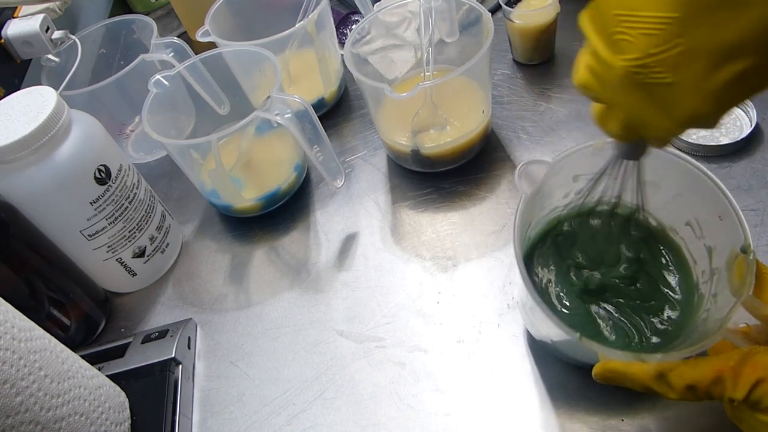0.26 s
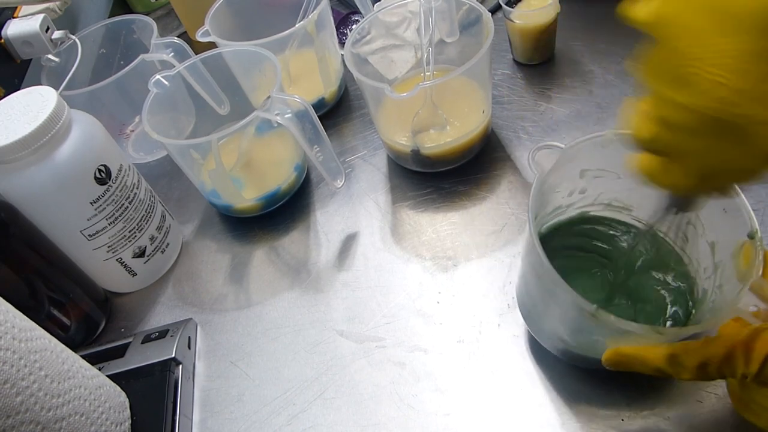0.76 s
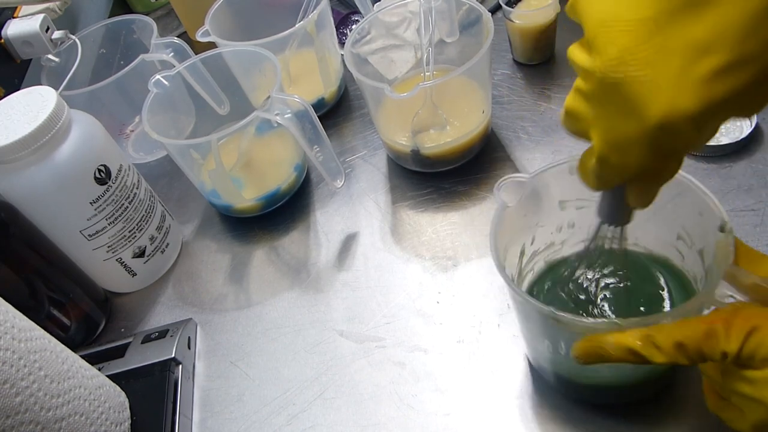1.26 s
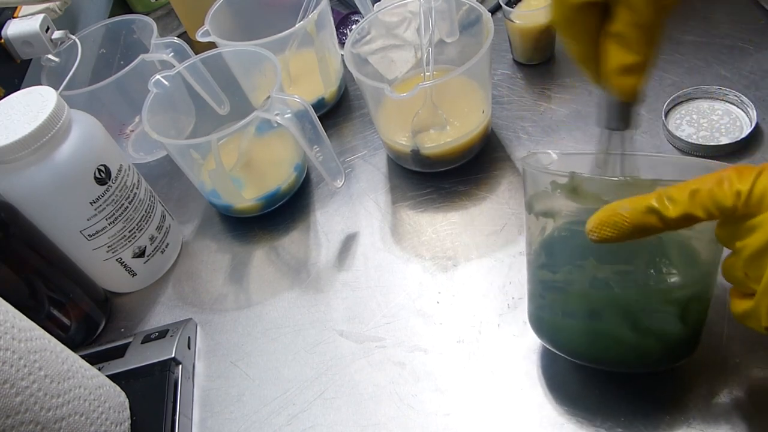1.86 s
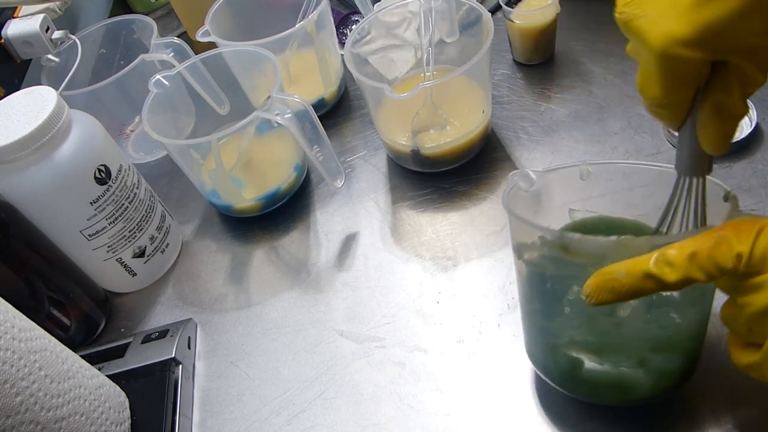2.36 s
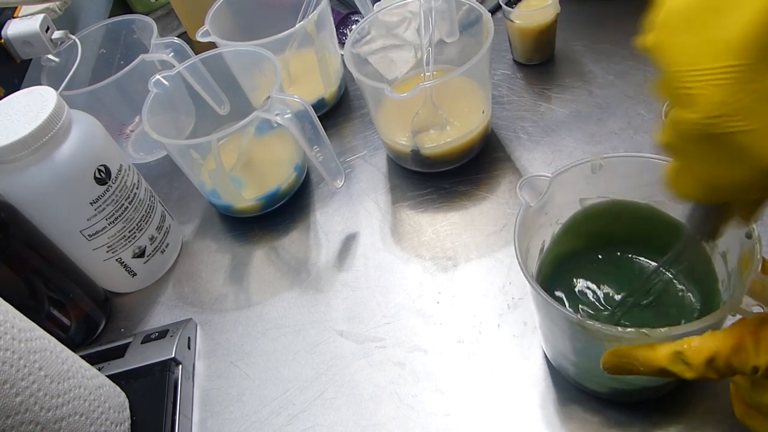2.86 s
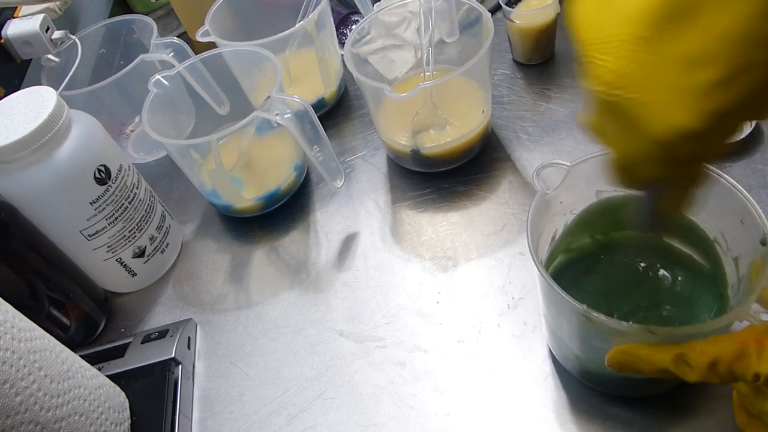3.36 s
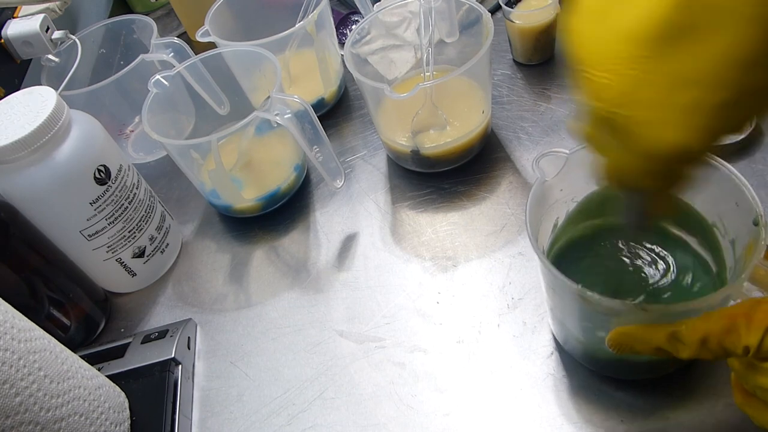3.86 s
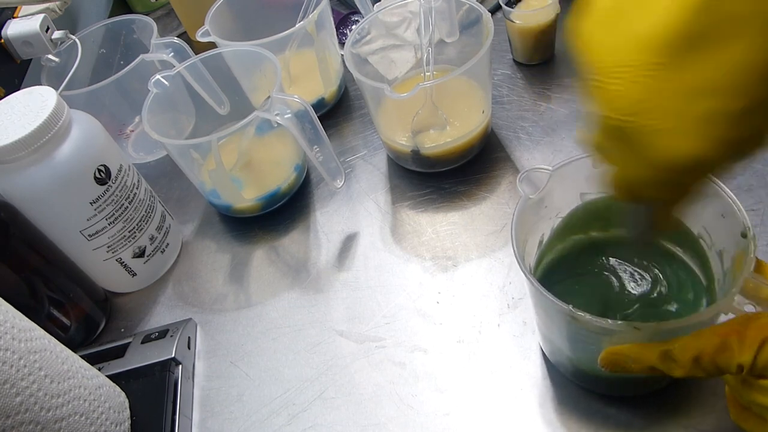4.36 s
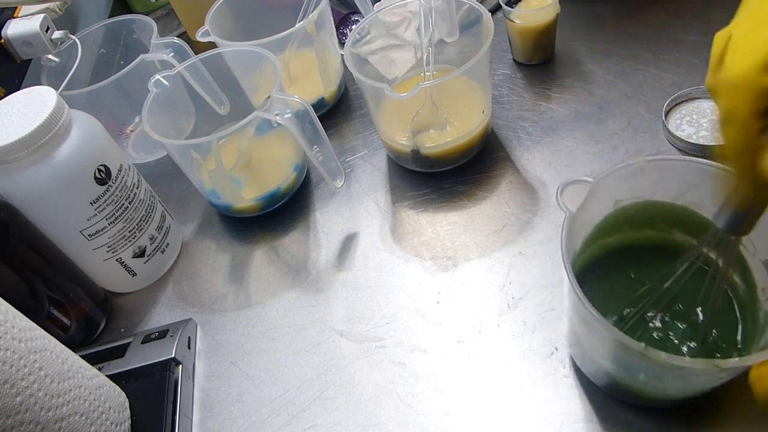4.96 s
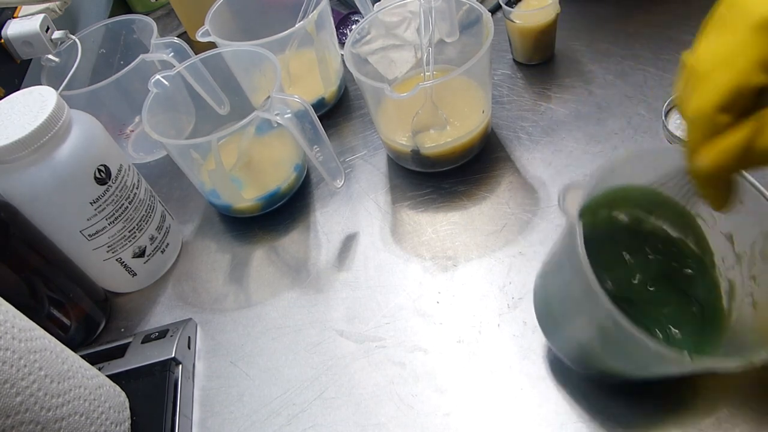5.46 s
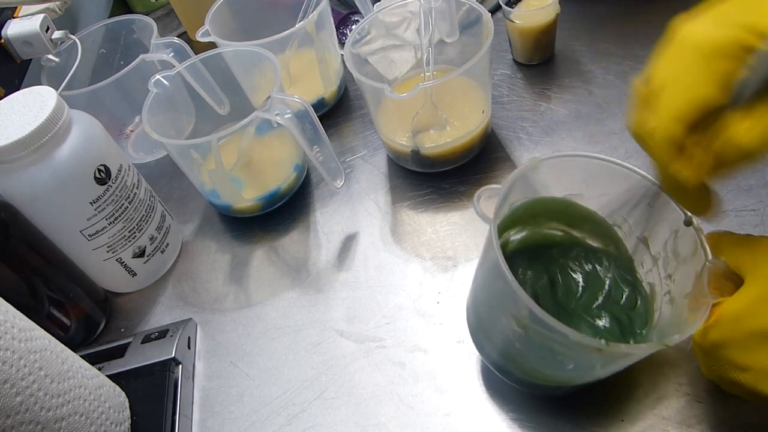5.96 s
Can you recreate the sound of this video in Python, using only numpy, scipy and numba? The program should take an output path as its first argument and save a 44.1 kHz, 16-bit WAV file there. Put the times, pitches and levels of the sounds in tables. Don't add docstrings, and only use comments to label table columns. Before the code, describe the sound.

Quick bunches of hard plastic clacks from a wire whisk, with scraping, gulping batter and a short pause before the beating resumes.

```python
import sys
import numpy as np
from scipy import signal
from scipy.fft import rfft, irfft, next_fast_len
from scipy.io import wavfile
from scipy.ndimage import uniform_filter1d
from numba import njit

SR = 44100
rng = np.random.default_rng(int(sys.argv[2]) if len(sys.argv) > 2 else 0)


def voltage_ratio(level):
    return 10 ** (np.asarray(level, float) / 20)


def master_out(mix):
    frames = np.transpose(np.atleast_2d(mix))
    ceiling = np.clip(frames, -1, 1)
    pcm = np.round(ceiling * 32767).astype(np.int16)
    wavfile.write(sys.argv[1], SR, pcm)


N = 273949


def level(x, db):
    return x * voltage_ratio(db) / np.sqrt(np.mean(x ** 2))


def colour(x, points):
    hz, db = np.transpose(points)
    size = next_fast_len(x.shape[-1])
    f = np.arange(size // 2 + 1) * SR / size
    gain = voltage_ratio(np.interp(np.log(f + 1), np.log(hz), db))
    return irfft(rfft(x, size) * gain, size)[..., :x.shape[-1]]


def fade(t, t60):
    return np.exp(-np.log(1000) * t / t60)


@njit
def follow(x, attack, release):
    e, out = 0., np.empty(len(x))
    for i in range(len(x)):
        e += (x[i] - e) * (attack if x[i] > e else release)
        out[i] = e
    return out


def slips(rate, spread_db):
    size_db = spread_db * np.minimum(rng.exponential(size=N), 4)
    return (rng.random(N) < rate / SR) * rng.standard_normal(N) * voltage_ratio(size_db)


def strokes(rate):
    k = int(SR / rate)
    held = np.repeat(rng.standard_normal(N // k + 1), k)
    return 1.47 * uniform_filter1d(uniform_filter1d(held, k), k)[:N]


# start_s, peak_db, belly_db, face_hz
FOOT_BLOWS = [(0.2087, -22.5, -8.5, 2790), (.2594, -48, 7, 1940), (.2705, -28, -6, 2040),
              (1.4169, -16, -7.5, 1920), (2.1167, -8, -9, 1570), (3.3626, -14.5, -18, 2210),
              (3.426, -19.5, -8, 2030), (3.9423, -12.5, -8.5, 3090), (4.1583, -10.5, -20, 2450),
              (4.1849, -16, -4.5, 1890), (4.509, -15, -14, 1930), (4.967, -20, -9, 2080),
              (5.122, -24.5, -8, 1795)]
HEEL_BLOWS = [(0.4868, -18, -11, 1990), (0.5303, -11.5, -15, 2220), (0.6889, -20, -18, 3120),
              (1.118, -14, -9.5, 2000), (1.616, -10, -17, 2206), (2.6034, -7.5, -18.5, 3480),
              (2.957, -9, -12.5, 3080), (3.2675, -12.5, -19, 2460), (3.3898, -17.5, -15, 2150),
              (3.575, -11, -16.5, 3363), (3.608, -7.5, -22, 2610), (4.3622, -16.5, -14.5, 2260),
              (4.3824, -13, -27, 2550), (4.601, -14, -15, 2918), (5.912, -28, -6, 3220),
              (6.135, -20, -15, 2020)]
WAIST_BLOWS = [(0.626, -14.5, -15, 3580), (0.895, -20.5, -13, 1940), (1.2928, -15, -9, 2140),
               (1.66, -14.5, -10, 1880), (1.7584, -12, -5, 3340), (1.8475, -24, -7.5, 1756),
               (2.1899, -20.5, -27, 2480), (2.2612, -15, -7.5, 2480), (2.308, -15.5, -14, 4030),
               (2.4326, -16, -10.5, 2790), (2.5487, -12.5, -13.5, 2390), (2.857, -9, -21.5, 3480),
               (2.9038, -16.5, -5.5, 2800), (3.462, -19.5, -19, 1970), (3.5124, -13.5, -22, 2320),
               (3.7072, -22.5, -16, 3970), (3.7547, -13.5, -21, 2170), (3.808, -15.5, -12, 2130),
               (3.8702, -15, -36, 2470), (4.1186, -18.5, -33, 2180), (4.62, -15, -29, 2510),
               (4.744, -22, -14, 4120), (5.052, -19, -10.5, 2010), (5.658, -9, -17.5, 3114),
               (5.753, -12.5, -11.5, 2430), (5.849, -28, -5, 2640), (5.874, -22, -11.5, 2060),
               (6.173, -30, -5.5, 3300)]
CHEST_BLOWS = [(0.443, -17, -14, 2010), (0.7758, -10, -20.5, 4200), (0.9926, -11, -20, 3400),
               (1.0141, -12.5, -11.5, 1880), (1.6113, -21.5, -15, 2210), (1.974, -17.5, -8, 2300),
               (2.032, -11.5, -12, 2110), (2.164, -19.5, -4, 3520), (2.205, -17.5, -13, 3040),
               (2.324, -10, -11.5, 3630), (2.481, -17.5, -10.5, 2720), (2.7467, -13.5, -30, 3160),
               (3.1704, -14.5, -25, 2100), (4.304, -16.5, -12, 2150), (4.3194, -15.5, -16.5, 2340),
               (5.796, -24.5, -7, 2480), (6.011, -19, -9, 1750)]
NECK_BLOWS = [(0.0678, -13, -12, 2880), (0.107, -21.5, -17, 2500), (0.1332, -7.5, -17, 3980),
              (0.3373, -4.5, -12.5, 3180), (0.6496, -13.5, -13.5, 3240), (0.817, -14.5, -17, 3570),
              (0.9159, -5, -21.5, 4010), (1.921, -13.5, -16, 2610), (2.496, -14, -15, 3090),
              (2.6986, -16.5, -16, 2580), (2.718, -13, -18, 2260), (3.3251, -16.5, -18, 2180),
              (3.644, -16.5, -26, 2100), (3.849, -14.5, -12, 2650), (4.2599, -34, 2, 1840),
              (4.4048, -9, -17, 4077), (5.463, -19, -13.5, 3010), (5.4906, -18.5, -10.5, 2100),
              (5.561, -36, -1, 2550), (5.971, -9.5, -16.5, 3060), (6.0308, -17.5, -8, 2670),
              (6.0939, -10, -16, 1560)]
RIM_BLOWS = [(.587, -8.5, -22, 4050), (.736, -6.5, -30, 4050), (0.843, -11, -18.5, 3420),
             (0.9784, -12.5, -18, 3020), (1.1, -7.5, -49, 2630), (1.178, -16, -23, 3910),
             (1.252, -19, -38, 4230), (1.4088, -22.5, -33, 1830), (2.589, -18, -31, 2090),
             (2.816, -14.5, -19, 3660), (3.128, -9, -26, 3060), (4.0012, -12.5, -22, 3410),
             (4.088, -24, -25, 2610), (5.6554, -21, -29, 3280)]
BELLY_PITCHES = [771, 832.5, 1052, 1197, 1249, 1173]
# start_s, peak_db
LIGHT_TOUCHES = [(.02, -19), (.061, -24), (.332, -31), (.5202, -25), (.702, -21), (.7291, -18.5),
                 (.8254, -21), (.9448, -18), (1.0961, -19), (2.369, -20.5), (2.4104, -20.5),
                 (2.4542, -18.5), (2.6312, -17), (2.7384, -20), (2.8265, -28), (2.9494, -19), (2.9744, -27),
                 (3.193, -22), (3.2568, -25), (3.6234, -19), (3.6382, -27), (3.8965, -16.5),
                 (4.0404, -20.5), (4.433, -18), (4.5465, -22.5), (4.5665, -19.5), (5.6897, -23.5),
                 (5.7454, -32), (5.9627, -25), (6.1054, -19.5)]
# start_s, peak_db
MORE_TOUCHES = [(.0121, -23), (.4774, -38), (1.0867, -24), (1.2654, -25.5), (1.482, -25), (2.009, -19.5),
                (2.0835, -21.5), (2.5658, -34), (2.8394, -22), (3.477, -21.5), (3.7218, -21.5), (4.651, -32),
                (4.6862, -31), (4.8224, -32.5), (5.301, -41), (5.581, -28), (5.603, -25.5), (5.7124, -21)]


def contacts():
    heights = (FOOT_BLOWS, HEEL_BLOWS, WAIST_BLOWS, CHEST_BLOWS, NECK_BLOWS, RIM_BLOWS)
    struck = [tuple(row) + (hz,) for rows, hz in zip(heights, BELLY_PITCHES) for row in rows]
    light = [(s, db, -11, 2350, 990) for s, db in list(LIGHT_TOUCHES) + list(MORE_TOUCHES)]
    return struck + light


# pitch_hz, level_db, t60_s
JUG_MODES = [(700, -5, .08), (755, 0, .07), (815, 0, .07), (990, -2, .06), (1110, -5, .05), (1235, 0, .06),
             (1590, -3, .045), (1755, -2, .045), (2000, 0, .045), (2160, 0, .045), (2350, 0, .04),
             (2530, 0, .045), (2870, -1, .035), (3050, -1, .035), (3190, -1, .035), (3370, -1, .035),
             (3525, 0, .045), (3800, -2, .035), (4050, 0, .035), (4500, -8, .03)]


def rings(t, spot_db, detune):
    hz, db, t60 = np.array(JUG_MODES).T[:, :, None]
    wet_damp = 0.91
    tone = np.sin(2 * np.pi * hz * (1 + detune[:, None]) * t)
    return np.sum(voltage_ratio(db + spot_db[:, None]) * fade(t, t60 * wet_damp) * tone, axis=0)


# freq_hz, level_db (per Hz)
BLOW_COLOUR = [(300, -30), (600, -10), (800, 0), (1500, -3), (2200, -2), (4000, -3), (4600, -8),
               (9900, -12), (14500, -28), (16000, -44)]


def blows(stir_db):
    out, size = np.zeros(N + 8192), 4096
    t = np.arange(size) / SR
    belly = [(100, -70), (350, -20), (560, -10), (690, -19), (740, 0), (1350, 0), (1700, -30), (3000, -60)]
    face = [(300, -70), (1150, -30), (1500, -6), (1950, 0), (4200, 0), (4900, -8), (7000, -30)]
    edge = [(1000, -70), (4000, -30), (4900, 0)]
    spot_spread_db, tick_db, snap_db = 7, 13, -1
    grip_t60_s, grip_db = 0.025, 12
    for s, peak_db, belly_db, face_hz, belly_hz in contacts():
        i = int(s * SR)
        chance = rng.standard_normal((2, len(JUG_MODES)))
        wires = rng.random((2, 5))
        edge_db = -12 + 0.096 * (stir_db[i] + 34.5) + 0.12 * (peak_db + 13.5)
        edge_db = edge_db - 1.5 * rng.standard_normal()
        wall = rings(t, spot_spread_db * chance[0], 0.0012 * chance[1])
        wall = wall / np.abs(wall).max()
        wall = wall + voltage_ratio(-10.0) * fade(t, 0.054) * np.sin(2 * np.pi * face_hz * t)
        wall = wall + voltage_ratio(-11.5) * fade(t, 0.089) * np.sin(2 * np.pi * belly_hz * t)
        bunch = np.zeros(size)
        lag = wires[0] * .008 * np.arange(5) / 4
        landing = np.clip(lag * SR, 0, 399).astype(int)
        np.add.at(bunch, landing, voltage_ratio(-8.0 * wires[1]) * fade(lag, 0.029))
        chatter = (rng.random(size) < 1200 / SR) * rng.uniform(-1.01, 1, size)
        bunch += voltage_ratio(-13.0) * chatter * fade(t, 0.15)
        shake = signal.fftconvolve(fade(t, 0.014) + voltage_ratio(-11.5) * fade(t, 0.15), np.abs(bunch))[:size]
        tick = colour(bunch, BLOW_COLOUR)
        tick = tick / np.abs(tick).max()
        crack = shake * level(colour(rng.standard_normal(size), BLOW_COLOUR), 0)
        crack = crack + voltage_ratio(tick_db) * tick
        ring = signal.fftconvolve(wall, bunch)[:size] + voltage_ratio(-17) * crack
        ring = ring * (fade(t, grip_t60_s) + voltage_ratio(grip_db))
        ring = ring + voltage_ratio(snap_db) * np.abs(ring).max() * tick
        rough_edge = edge + list(zip((5800, 7700, 9500, 11400, 13700), 2.6 * chance[1]))
        parts = ((ring, belly, belly_db + 4.0), (ring, face, 0), (crack, rough_edge, edge_db + 7.0))
        for source, zone, db in parts:
            part = colour(np.pad(source * np.hanning(2 * size)[size:], 256), zone)
            out[i:i + len(part)] += part * voltage_ratio(peak_db + db - 2) / np.abs(part).max()
    return out[256:N + 256]


def pings(table, t60, grit_db, width):
    out, t = np.zeros(N + 2048), np.arange(2048) / SR
    for s, db, hz in table:
        band = [(hz / width, -20), (hz, 0), (hz * width, -14)]
        grit = level(colour(rng.standard_normal(2048), band), grit_db)
        ping = fade(t, t60) * (np.sin(2 * np.pi * hz * t) + grit)
        ping = ping + voltage_ratio(-19) * fade(t, 8.0 * t60) * grit
        out[int(s * SR):int(s * SR) + 2048] += voltage_ratio(db - 4.0) * ping
    return colour(out[:N], [(1200, -32), (1800, 6.0), (12500, -2), (16000, -24)])


# start_s, peak_db, pitch_hz
WIRE_SNAPS = [(0.1322, -22, 5250), (0.1516, -24, 5400), (0.2074, -30, 8300), (0.3413, -9, 6200),
              (0.6279, -37, 9200), (0.6514, -16.5, 5100), (0.6891, -23, 4770), (0.8259, -14.5, 5750),
              (0.8405, -23.5, 6700), (0.913, -10, 5800), (1.0134, -16, 5830), (1.1777, -19, 8500),
              (1.4158, -25, 5670), (1.5009, -36.0, 6630), (1.5263, -42, 4840), (1.661, -25, 5700),
              (1.6725, -32, 6480), (2.1638, -25.0, 8740), (2.2035, -28, 8550), (2.2447, -27, 5020),
              (2.3693, -23, 8300), (2.4561, -24, 5270), (2.536, -29, 5140), (2.6891, -28, 9840),
              (2.706, -26, 4840), (2.7377, -22, 8100), (2.7475, -28, 8300), (2.9108, -21, 11400),
              (3.1283, -17.5, 4750), (3.4364, -26, 9730), (3.4748, -42, 5130), (3.593, -30, 6030),
              (3.6083, -23, 5800), (3.6378, -18, 6200), (3.7058, -26, 5040), (3.8049, -21, 7940),
              (3.8703, -20.5, 6200), (4.096, -29, 7360), (4.1187, -15, 7100), (4.1422, -17.5, 9540),
              (4.1848, -14.5, 5700), (4.2601, -25, 4800), (4.3826, -18, 7000), (4.3991, -15.5, 9300),
              (4.4185, -17, 9100), (4.5667, -19, 9150), (4.6015, -17, 4560), (4.6232, -18, 6450),
              (4.692, -25.5, 8350), (5.463, -19.5, 4980), (5.5312, -38, 8850), (5.5347, -32, 9300),
              (5.657, -19, 8900), (5.795, -31, 8700), (5.8592, -30, 9300), (5.9091, -36, 9200),
              (5.941, -33, 4830), (5.9641, -20.5, 5170), (6.0135, -29, 6800), (6.1016, -15.5, 5500)]


def snaps():
    return pings(WIRE_SNAPS, t60=0.011, grit_db=1.5, width=5.2)


# start_s, peak_db, pitch_hz
WIRE_FLICKS = [(0.2607, -38, 1940), (0.4767, -25, 1820), (0.6136, -17, 4200), (0.6283, -21, 3530),
               (0.6524, -19.5, 3060), (0.7399, -14, 3750), (0.9473, -14.5, 4140), (0.992, -18, 3600),
               (1.0595, -23.5, 3230), (1.178, -21.5, 3780), (1.3709, -37.5, 1840), (1.4185, -13, 2160),
               (1.5267, -35.5, 2000), (1.6174, -14, 3580), (1.9748, -15, 2380), (1.9922, -22, 2500),
               (2.1908, -21.5, 2570), (2.2039, -21, 3550), (2.2847, -32, 2300), (2.6462, -25, 1930),
               (2.6904, -30, 3520), (2.8164, -16, 3340), (3.1292, -23, 3130), (3.3386, -26, 2370),
               (3.355, -30, 3320), (3.5909, -21, 3950), (4.1859, -21, 2960), (4.2564, -35, 2970),
               (4.2627, -29, 2920), (4.301, -24, 1840), (4.4364, -22, 3210), (4.4895, -32, 2820),
               (5.5163, -37, 2170), (5.563, -32, 2540), (5.6039, -46, 2240), (5.645, -27, 3140),
               (5.7953, -21.5, 2400), (5.9642, -19.5, 3600), (6.1019, -21, 3210), (6.173, -28.5, 3080)]


def flicks():
    return pings(WIRE_FLICKS, t60=0.022, grit_db=-4.5, width=3.5)


# start_s, level_db
STIR_LEVEL = [(0.0, -42), (0.36, -43.5), (0.69, -43), (0.95, -36), (1.4, -39), (1.71, -42.5), (1.92, -40),
              (2.13, -39), (2.8, -38.5), (2.97, -35), (3.08, -42.5), (3.35, -36.5), (3.84, -30.5),
              (4.48, -32.5), (4.77, -45.5), (5.5, -53.5), (5.66, -47.5), (6.21, -39)]


def stirring():
    s, db = np.transpose(STIR_LEVEL)
    return np.interp(np.arange(N) / SR, s, db)


def drag(hits):
    follow_through, lift_s = 0.69, 0.043
    quick = follow(np.abs(hits), 1 / (0.0017 * SR), 1 / (lift_s * SR)) + 1e-4
    slow = uniform_filter1d(quick, SR // 3)
    return follow_through * np.clip(20 * np.log10(quick / slow), -20, 6)


def scrape(db):
    film = [(4000, -31), (7000, 1), (11000, 0), (14000, -7), (15500, -11)]
    ticks = slips(700, 3.0)
    t = np.arange(2048) / SR
    still = np.zeros(len(JUG_MODES))
    wall = signal.fftconvolve(ticks, rings(t, still, still))[:N]
    grit = signal.fftconvolve(np.abs(ticks), fade(t, 0.02))[:N] * rng.standard_normal(N)
    fizz = voltage_ratio(2.6 * strokes(22.6)) * level(colour(slips(7300, 6.9), film), -10.5)
    rub = level(wall, -7.5) + level(colour(grit, BLOW_COLOUR), -0.5) + fizz
    return voltage_ratio(db + 2.56 * strokes(11)) * rub


def glide():
    t = np.arange(N) / SR
    swell_at_s, swell_width_s, swell_db = 5.28, 0.064, 8.1
    tone = [(1500, -27), (4400, -14), (4650, 11), (4900, 2), (12000, 2), (15000, -9)]
    swell = swell_db * np.exp(-((t - swell_at_s) / swell_width_s) ** 2)
    contact = np.interp(t, (4.7, 4.8, 5.45, 5.55), [0, 1, 1, 0]) * voltage_ratio(-57 + swell)
    return contact * level(colour(rng.standard_normal(N), tone), 0)


def thumps(modes):
    t = np.arange(4096) / SR
    body = np.zeros(4096)
    for k, (hz, width_hz, db) in enumerate(modes):
        decay = np.sqrt(width_hz) * np.exp(-np.pi * width_hz * t)
        body += voltage_ratio(db) * decay * np.sin(2 * np.pi * hz * t) * (-1) ** k
    return signal.fftconvolve(slips(900, 1.0), body)[:N]


# pitch_hz, width_hz, level_db
SLOP_MODES = [(267, 150, -30), (314.4, 9.9, 12), (444, 227, 22), (565, 4.1, 15), (815, 930, 10.5)]
# pitch_hz, width_hz, level_db
BENCH_MODES = [(135, 45, 17), (165, 33, 19.5), (206, 27, 18.5)]
# start_s, level_db, t60_s
JUG_SHOVES = [
    (.05, -52, 0.067),
    (1.43, -46, 0.37),
    (2.93, -33, 0.28),
    (3.2, -57.5, 0.88),
    (4.98, -61.5, 0.94),
    (5.67, -48.5, 0.24),
]


def batter(stir_db):
    jug, bench = thumps(SLOP_MODES), thumps(BENCH_MODES)
    jug = level(colour(jug, [(120, -12), (240, 2.5), (900, 6.5), (1500, 15)]), 2.0)
    bench = level(colour(bench, [(200, -4), (400, -13)]), -0.097)
    push = voltage_ratio(-55 + 0.93 * (stir_db + 40.5))
    press = push * voltage_ratio(-17 - 0.3 * (stir_db + 30.0) + 3.6 * strokes(11))
    rise_s, shove_bench_db = 0.068, -3
    for s, db, t60 in JUG_SHOVES:
        since = np.arange(N) / SR - s
        shove = voltage_ratio(db) * np.clip(1 + since / rise_s, 0, 1) ** 2 * fade(np.maximum(since, 0), t60)
        push = push + shove
        press = press + voltage_ratio(shove_bench_db) * shove
    return push * jug + press * bench


# start_s, peak_db, pitch_hz
AIR_GULPS = [(0.34, -40, 513), (0.442, -38.5, 593), (0.781, -39, 490), (0.916, -33, 562),
             (0.973, -29.5, 328), (1.096, -36, 555), (1.279, -41, 405), (1.426, -29, 365),
             (1.525, -33.5, 278), (1.761, -46, 465), (2.034, -51, 410), (2.164, -39, 566),
             (2.434, -36, 588), (2.702, -34.5, 612), (2.883, -28, 530), (3.2, -36, 384),
             (3.365, -29.5, 583), (3.582, -24, 548), (3.913, -33, 334), (3.972, -33, 306),
             (4.066, -30, 550), (4.121, -39, 390), (4.162, -28.5, 560), (4.33, -24.5, 549),
             (4.383, -35, 595), (4.651, -33.5, 559), (4.97, -36, 572), (5.659, -42, 574), (5.753, -34, 553),
             (5.968, -46, 374)]
# start_s, peak_db, pitch_hz
MORE_GULPS = [(0.784, -37, 302), (.81, -41, 392), (.95, -34, 330), (1.117, -32.5, 420), (1.44, -36, 293),
              (1.455, -36, 448), (1.53, -34.5, 587), (2.885, -36, 217), (2.91, -26, 308),
              (2.931, -36, 190), (2.956, -27, 481), (2.972, -29, 426), (2.995, -35, 400),
              (4.19, -29, 294), (4.972, -41, 413), (5.055, -40, 429), (5.126, -46, 374)]


def gulps():
    out, t = np.zeros(N + 4096), np.arange(4096) / SR
    for s, db, hz in list(AIR_GULPS) + list(MORE_GULPS):
        turn = 2 * np.pi * hz * t * (.99 + .5 * t)
        tone = np.sin(turn) + voltage_ratio(-5) * np.sin(rng.uniform(1.4, 4.0) * turn)
        out[int(s * SR):int(s * SR) + 4096] += voltage_ratio(db) * fade(t, 0.11) * np.clip(t / 0.0017, 0, 1) * tone
    return out[:N]


# start_s, peak_db, pitch_hz
FOOT_KNOCKS = [(0.146, -49, 165), (1.08, -48, 185), (1.269, -48, 156), (1.36, -43, 200), (1.421, -52, 135),
               (1.779, -44, 201), (1.86, -52, 141), (1.94, -45, 163), (2.139, -52.5, 138), (2.4, -53, 150),
               (2.499, -44.5, 160), (2.6, -44, 202), (2.681, -54, 155), (3.21, -57, 157), (3.376, -49, 165),
               (3.52, -46, 161), (4.36, -48, 198), (5.66, -44, 167.4), (6.108, -50, 154)]


def thuds():
    out, t = np.zeros(N + 8192), np.arange(8192) / SR
    rise_s, t60_s = 0.011, 0.38
    for s, db, hz in FOOT_KNOCKS:
        apart, turn = rng.random(2)
        partner_hz = hz * (0.81 + 0.543 * apart)
        tone = np.sin(2 * np.pi * hz * t) + voltage_ratio(-4.5) * np.sin(2 * np.pi * (partner_hz * t + turn))
        out[int(s * SR):int(s * SR) + 8192] += voltage_ratio(db) * fade(t, t60_s) * np.clip(t / rise_s, 0, 1) * tone
    return out[:N]


def case(x):
    t = np.arange(2048) / SR
    treble = [(4500, -17.5), (9000, -12.5), (13000, -10)]
    scatter = colour(rng.standard_normal(2048) * fade(t, 0.008), treble)
    side = signal.fftconvolve(x, scatter / np.sqrt(np.sum(scatter ** 2)))[:N]
    return voltage_ratio(-13) * side * np.array([[1], [-1]])


def room(x):
    t = np.arange(SR // 2) / SR
    mid, side = rng.standard_normal((2, len(t))) * fade(t, 0.085) * np.clip(t / 0.0078, 0, 1)
    side = colour(side, [(150, -17), (300, -3.0), (1500, -14.0), (6000, -11)])
    tail = np.array([mid + side, mid - side]) / np.sqrt(np.sum(mid ** 2))
    tail = colour(tail, [(190, -20), (330, 1), (12000, -5.5)])
    return voltage_ratio(-7.0) * signal.fftconvolve(tail, x[None], axes=1)[:, :N]


# freq_hz, level_db (per Hz)
HUM_COLOUR = [(30, -8), (100, -1), (250, 2), (500, 5.5), (1000, 9), (2000, 6), (4000, 0), (11000, -6),
              (14000, -20), (16000, -30)]


def hum(loud):
    mid, side = colour(rng.standard_normal((2, N)), HUM_COLOUR)
    heard = follow(np.abs(loud), 1 / (0.0012 * SR), 1 / (.4 * SR))
    duck = np.minimum(voltage_ratio(-30) / (heard + 1e-9), 1) ** .45
    return duck * level(np.array([mid + 0.11 * side, mid - 0.38 * side]), -48.5)


def scene():
    stir_db = stirring()
    hits = blows(stir_db) + snaps() + flicks()
    jug = hits + scrape(stir_db + drag(hits)) + glide() + batter(stir_db) + gulps() + thuds()
    return jug + room(jug) + case(jug) + hum(jug)


def band_limit(x):
    return signal.sosfilt(signal.butter(12, 16480, fs=SR, output="sos"), x)


# freq_hz, level_db
MIC_RESPONSE = [(30, -17), (70, -10), (110, -13.5), (140, 0), (9000, 0.5), (13000, -1), (15000, -0.5)]
# freq_hz, level_db
PORT_BALANCE = [(150, 0), (350, -1.5), (700, -1), (1400, 0), (4000, -0.7), (12000, -1.5)]


def record(dry):
    ceiling = 1.1
    dry = ceiling * np.tanh(dry / ceiling)
    dry = colour(dry, list(MIC_RESPONSE) + [(15800, 0), (16600, -70)])
    left = colour(dry[0], [(hz, db / 2) for hz, db in PORT_BALANCE])
    right = colour(dry[1], [(hz, -db / 2) for hz, db in PORT_BALANCE])
    return band_limit(np.array([left, right]))


dry = scene()
out = record(dry)
master_out(out)
```